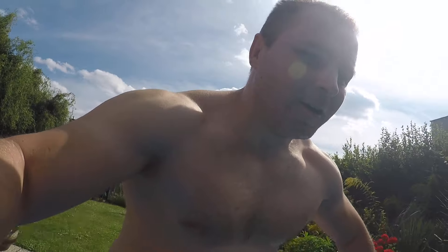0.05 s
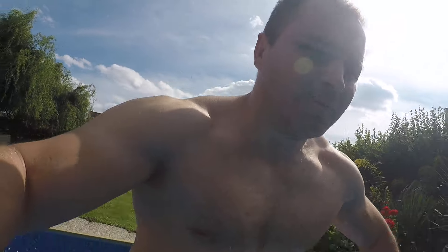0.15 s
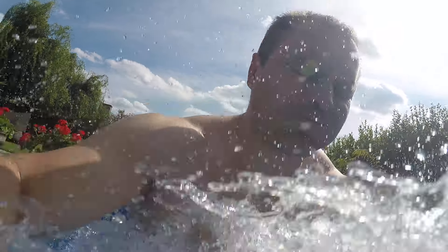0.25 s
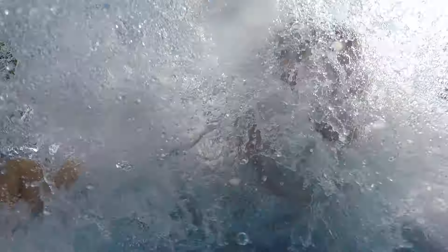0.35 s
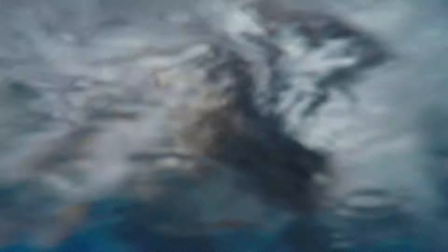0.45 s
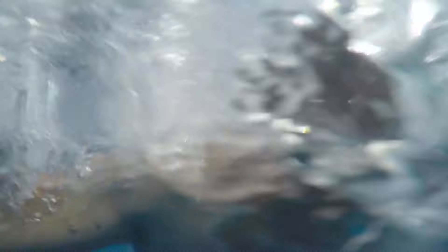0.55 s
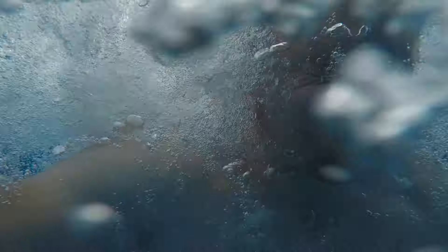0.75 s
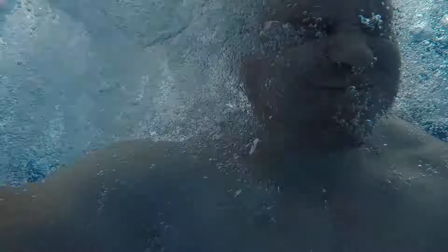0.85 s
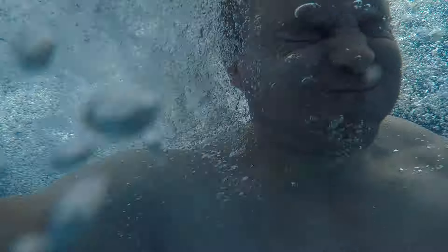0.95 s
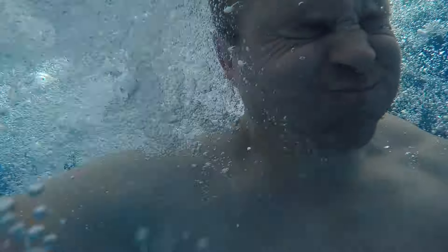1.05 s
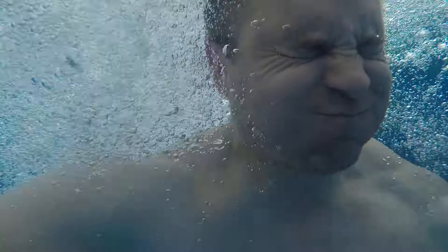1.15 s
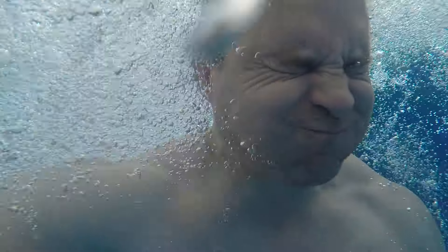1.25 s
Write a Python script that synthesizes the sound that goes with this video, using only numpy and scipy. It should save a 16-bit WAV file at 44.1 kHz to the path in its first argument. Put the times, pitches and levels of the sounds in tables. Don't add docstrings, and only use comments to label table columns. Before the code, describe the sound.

Splash into an outdoor pool, very close: low buffeting and ringing spray, sharp slaps with hollow knocks, then submerged sound, with a deep air-pocket boom, fizz turning dull and sparse soft glugs.

```python
import sys
import numpy as np
from scipy import signal
from scipy.io import wavfile
from scipy.ndimage import uniform_filter1d

SR = 44100
rng = np.random.default_rng(int(sys.argv[2]) if len(sys.argv) > 2 else 0)


def transcribe(signal):
    frames = np.atleast_2d(signal).T
    limited = np.clip(frames, -1, 1)
    pcm = np.round(limited * 32767).astype(np.int16)
    wavfile.write(sys.argv[1], SR, pcm)


def nominal_scale(level):
    x = np.asarray(level, float) / 20
    return 10 ** x


N = 57330
TIME_S = np.arange(N) / SR

# t/s, peak level/dB, t60/s, treble tilt/(dB per octave)
SLAPS = [(0.1235, -14, 0.0037, 0.5), (0.1352, -20, 0.036, 4), (0.3311, 3.5, 0.0068, -0.5),
         (0.3373, 10, 0.008, -4.5), (0.3395, -6.5, 0.032, -0.5), (0.3425, 7, 0.012, -0.5),
         (0.3478, -11.5, 0.046, -2), (0.359, -6.5, 0.017, -1), (0.3847, -3, 0.0052, -0.5),
         (0.441, -18, 0.048, 1), (0.4619, -12, 0.036, 0), (0.4656, 12, 0.014, -0.5),
         (.4677, 7.5, 0.0056, 2), (0.4729, -10.5, 0.13, -3), (0.4794, -6.5, 0.044, 0.5),
         (0.5056, -32, 0.015, 2.5), (0.524, -30, 0.062, -2.5)]


def evened(x):
    return x / np.sqrt(np.mean(x ** 2) + 1e-20)


def curve(rows, outside=-120, index=1):
    a = np.array(rows)
    return np.interp(TIME_S, a[:, 0], a[:, index], left=outside)


def read(points, hz):
    f, value = np.transpose(points)
    return np.interp(np.log(hz + 1), np.log(f + 1), value, left=-90)


def colour(x, points, tilt_db=0):
    hz = np.abs(np.fft.fftfreq(4096, 1 / SR))
    gain_db = read(points, hz) + tilt_db * np.log2((hz + 100) / 2000)
    min_phase = np.exp(np.conj(signal.hilbert(np.log(nominal_scale(gain_db)))))
    taps = np.fft.ifft(min_phase).real[:2048]
    return signal.oaconvolve(x, taps)[:len(x)]


def resonate(x, hz, width_hz):
    return signal.lfilter(*signal.iirpeak(hz, hz / width_hz, SR), x)


def drift(x, hz, width_hz):
    turn = np.exp(2j * np.pi * np.cumsum(hz) / SR)
    r = np.exp(-np.pi * width_hz / SR)
    baseband = signal.lfilter([1 - r], [1, -r], x / turn)
    return 2 * (turn * baseband).real


def add(mix, s, sound):
    part = mix[round(s * SR):][:len(sound)]
    part += sound[:len(part)]


def bubble(hz, t60, glide, rise):
    t = np.arange(0, t60, 1 / SR)
    envelope = (1 - np.exp(-t * hz / rise)) * nominal_scale(-60 * t / t60)
    return envelope * np.sin(2 * np.pi * hz * t * (1 + glide * t / t60))


def grains(lo_hz, hi_hz, per_s, cycles, spread_db, rise, count=30):
    out = np.zeros(N)
    for hz in np.geomspace(lo_hz, hi_hz, count):
        hit, size, sign = rng.random((N, 3)).T
        strength = nominal_scale(spread_db * np.minimum(-np.log(size + 1e-9), 3.2)) * np.sign(sign - .5)
        train = (hit < per_s / count / SR) * strength
        out += hz * signal.oaconvolve(train, bubble(hz, cycles / hz, 0.25, rise))[:N]
    return evened(out)


def pops(table, cycles, glide, rise, ragged, spread):
    out = np.zeros(N)
    t = np.arange(3000) / SR
    for s, db, hz in table:
        add(out, s, nominal_scale(db - 2.0) * bubble(hz, cycles / hz, glide, rise))
        burst = rng.standard_normal(3000) ** 3
        for _ in range(2):
            burst = resonate(burst, hz, spread * hz)
        envelope = nominal_scale(db - 60 * t * hz / cycles) * np.minimum(t * hz / rise, 1)
        add(out, s, ragged * envelope * evened(burst))
    return out


def slaps():
    # f/Hz, level/dB
    slap_tone = [(90, 12), (250, -13.5), (800, -12), (1840, -12), (3700, -9), (4800, -15), (10200, -25),
                 (15500, -36.5)]
    out, t = np.zeros(N), np.arange(2500) / SR
    for s, db, t60, tilt_db in SLAPS:
        x = evened(colour(rng.standard_normal(len(t)), slap_tone, tilt_db))
        add(out, s, nominal_scale(db - 1.5 - 60 * t / t60) * np.minimum(t / 0.00066, 1) * x)
    return out


def knocks():
    # t/s, peak level/dB, f/Hz
    knock_rows = [
        (.123, -30.5, 1070),
        (.3312, -0.5, 2510),
        (.3385, -7.5, 222),
        (.343, -5, 1780),
        (.343, -11, 540),
        (.349, 2.5, 3640),
        (.359, -12, 2240),
        (.4655, -10, 3630),
        (.466, 9.5, 1896),
    ]
    return pops(knock_rows, cycles=15.6, glide=0.023, rise=0.13, ragged=0.46, spread=0.65)


def shoves():
    # t/s, peak level/dB, swing f/Hz, ring/cycles, direction/(+1 or -1)
    shove_rows = [(0.291, -16, 39.8, 3, 1), (0.355, -5.5, 35, 2.6, 1), (0.38, -6.5, 21, 5.6, -1),
                  (0.403, -5.5, 46, 6.4, 1), (.428, -10, 25.7, 1.6, -1), (0.444, 5.5, 22.7, 1.7, 1),
                  (0.464, 2.5, 62, 3.94, -1), (0.481, -9, 44.9, 2.4, -1), (0.555, -20.5, 65, 5.8, 1),
                  (0.629, -20, 45.4, 2.4, 1), (0.692, -4, 66.6, 4.2, -1), (1.109, -19.5, 51.3, 3.1, -1),
                  (1.238, -34, 59.7, 12, 1)]
    out = np.zeros(N)
    for s, db, hz, cycles, way in shove_rows:
        add(out, s, nominal_scale(db + 1.0) * way * bubble(hz, cycles / hz, 0, 0.02))
    return out


def buffet():
    # t/s, level/dB
    buffet_level = [(0, -19.5), (.05, -38), (.11, -23), (.14, -24), (.234, -25), (.3, -19.5), (.34, -25.5),
                    (.44, -12.5), (.5, -25), (.58, -42), (.72, -46), (.81, -50.5), (1.07, -55.5),
                    (1.2, -45.5), (1.3, -38)]
    x = resonate(rng.standard_normal(N + SR), 28.3, width_hz=5.3)
    x = x / (uniform_filter1d(np.abs(signal.hilbert(x)), 2500) + 0.26 * x.std())
    x = signal.sosfilt(signal.butter(6, 75, fs=SR, output="sos"), x)[SR:]
    fade_in = np.minimum(.5 + np.arange(N) / 2000, 1)
    return nominal_scale(uniform_filter1d(curve(buffet_level), 400)) * evened(x) * fade_in


def spray():
    # t/s, level/dB
    spray_level = [(.121, -26), (.134, -36), (.138, -37.5), (.2, -28), (.3, -25.5), (.328, -29.5),
                   (.372, -25), (.405, -19), (.44, -24.5), (.448, -27.5), (.49, -68)]
    # f/Hz, level/dB
    spray_tone = [(150, -54), (600, -10.5), (1200, -1), (2500, -6.5), (5500, -8.5), (8000, -10.5),
                  (10300, -9), (15500, -25.5)]
    port_hz, wet_sag_hz, port_width_hz, port_db = 3835, 200, 480, 26.5
    x = grains(239, 19500, 7000, cycles=14.0, spread_db=0.86, rise=0.31)
    x = colour(x + 1.1 * rng.standard_normal(N), spray_tone)
    wet = TIME_S > SLAPS[2][0]
    port = drift(x, port_hz - wet_sag_hz * wet, port_width_hz)
    return nominal_scale(curve(spray_level) - 0.5) * evened(x + nominal_scale(port_db) * port)


def pocket():
    # t/s, f/Hz, level/dB
    pocket_rows = [
        (.698, 106.3, -45),
        (.705, 134.6, -4),
        (.713, 121, 2),
        (.722, 140, -4),
        (.74, 119, -15.5),
        (.814, 129, -30),
        (.888, 136.6, -40.5),
        (.95, 137, -69),
    ]
    turns = np.cumsum(curve(pocket_rows, 120)) / SR
    return nominal_scale(curve(pocket_rows, index=2)) * np.sqrt(2) * np.sin(2 * np.pi * (turns + 0.425))


def glugs():
    # t/s, peak level/dB, f/Hz
    glug_rows = [(.412, -14, 163.5), (.553, -8, 321), (.599, -18, 750), (.666, -11.5, 676),
                 (.685, -3.5, 321.4), (0.6995, -5, 345), (.762, -17, 432), (.772, -17.5, 340),
                 (.845, -30.5, 584), (.851, -31.5, 297), (.877, -23.5, 560), (.896, -19.5, 537),
                 (.924, -18, 553), (.965, -18.5, 517.6), (1.0, -34.5, 265), (1.02, -25.5, 496),
                 (1.043, -30, 823), (1.112, -18.5, 208.7), (1.116, -29, 456), (1.128, -18.5, 263),
                 (1.174, -30.5, 215), (1.205, -20, 418.5), (1.233, -10.5, 469), (1.247, -12, 556),
                 (1.29, -17.5, 462)]
    deep_s = .8
    early = [g for g in glug_rows if g[0] < deep_s]
    deep = [g for g in glug_rows if g[0] > deep_s]
    out = pops(early, cycles=21, glide=0.081, rise=0.61, ragged=0.43, spread=0.32)
    return out + pops(deep, cycles=33, glide=0.054, rise=1.56, ragged=0.3, spread=0.35)


def gurgle():
    # t/s, level/dB
    gurgle_level = [(.2, -47), (.3, -34.5), (.44, -29.5), (.475, -13.5), (.51, -25), (.65, -33),
                    (.68, -19.5), (.78, -23.5), (.85, -32.5), (1.07, -36.5), (1.12, -30), (1.26, -33),
                    (1.3, -28)]
    # f/Hz, level/dB
    gurgle_tone = [(60, -10.5), (150, -7.5), (400, -4), (650, -8.5), (950, -19.5), (2500, -41.5)]
    # t/s, low resonance f/Hz, high resonance f/Hz
    cavity_hz = [(.8, 294, 626), (.86, 282, 531), (.95, 247.5, 546), (1.0, 265.5, 520), (1.05, 250, 512),
                 (1.08, 239, 378), (1.12, 255, 473), (1.18, 207, 384), (1.24, 251, 512), (1.3, 224.6, 470)]
    x = grains(81.07, 2500, 700, cycles=31.7, spread_db=2.0, rise=0.747)
    x = colour(x + 0.45 * rng.standard_normal(N), gurgle_tone)
    cavity = sum(drift(x, curve(cavity_hz, 280, index=k), width_hz=30) for k in (1, 2))
    cavity_in = np.clip((TIME_S - .78) / 0.04, 0, 1)
    x = x + nominal_scale(11) * cavity * cavity_in
    return nominal_scale(curve(gurgle_level) - 3.5) * evened(x)


def ticks():
    # t/s, peak level/dB, f/Hz
    tick_rows = [(.5467, -18, 2484), (.548, -24, 1337), (.600, -30.5, 1720), (.525, -26, 1120),
                 (.578, -31, 2980), (.629, -27, 3370), (.6455, -15.5, 2644), (.6754, -38, 2490),
                 (.7063, -26, 3030), (.785, -30.5, 1476), (.786, -44, 2000), (.825, -42.5, 1770),
                 (1.0965, -48, 1940), (.9175, -43.5, 2300), (.9376, -45.5, 1684), (.970, -42.5, 1590),
                 (.971, -50, 2700), (.989, -48, 2085), (.9965, -43, 1886), (1.018, -45, 1840),
                 (1.038, -39, 1910), (1.075, -39.5, 1350), (1.076, -45, 2590), (1.0932, -42.5, 1516),
                 (1.104, -45, 2490), (1.1177, -35, 1840), (1.131, -44, 2490), (1.204, -37.5, 2190),
                 (1.207, -38.5, 1230), (1.2304, -28.5, 1820), (1.249, -40, 1740), (1.283, -47, 2350)]
    return pops(tick_rows, cycles=60, glide=0.042, rise=0.61, ragged=0.9, spread=0.17)


def snaps():
    # t/s, peak level/dB, f/Hz
    snap_rows = [(.516, -25, 5630), (.56, -27, 3900), (.604, -25.5, 4600), (.708, -37.5, 4200),
                 (.744, -31, 2960), (.766, -45.5, 4670), (.790, -28.5, 3310), (.846, -46, 3460),
                 (.871, -51.5, 5500), (.9376, -44, 4500), (.991, -52, 4950), (1.0, -45.5, 3200),
                 (1.017, -56, 3970), (.997, -39.5, 5150), (1.051, -36.5, 3670), (1.075, -35, 4220),
                 (1.094, -43.5, 4100), (1.119, -35.5, 3250), (1.133, -37, 3730), (1.189, -43.5, 3310),
                 (1.240, -49, 4440), (1.249, -22, 2934)]
    return pops(snap_rows, cycles=49.4, glide=0.05, rise=1.0, ragged=0.81, spread=0.23)


def pricks():
    # t/s, peak level/dB, f/Hz
    prick_rows = [(.527, -21, 7320), (.533, -36, 10770), (.538, -39.5, 9500), (.582, -51, 11100),
                  (.586, -49, 9700), (.678, -50, 8860), (.688, -42.5, 11190), (.712, -37.5, 6500),
                  (.767, -41.5, 9580), (.991, -49, 8620), (1.229, -54, 8200), (.547, -39, 8150),
                  (.567, -37, 11100), (.6, -32.5, 13050), (.63, -20, 9580), (.661, -25, 6500),
                  (.708, -36, 12800), (.724, -43, 9370), (.793, -49.5, 9650), (.803, -38.5, 7700),
                  (1.19, -42.5, 6160), (1.22, -41.5, 7550), (1.257, -44.5, 9860), (1.26, -44, 6000),
                  (1.292, -71, 13100)]
    return pops(prick_rows, cycles=40, glide=0.025, rise=1.3, ragged=0.34, spread=0.35)


def fizz():
    # t/s, level/dB
    fizz_level = [(.478, -48), (.5, -25.5), (.57, -31.5), (.7, -30.5), (.8, -45.5), (.86, -52),
                  (1.17, -72.5), (1.22, -42.5), (1.3, -58)]
    # f/Hz, level/dB
    fizz_tone = [(300, -10), (600, 1.5), (1300, -6), (2500, -1), (4500, -8), (15500, -36)]
    dull_db_per_oct_s = -47.5
    x = grains(500, 15000, 3000, cycles=24, spread_db=4.8, rise=1.5)
    x = evened(colour(x + .3 * rng.standard_normal(N), fizz_tone))
    hz, t, z = signal.stft(x, SR, nperseg=256)
    octaves = np.log2((hz[:, None] + 300) / 2500)
    z = z * nominal_scale(dull_db_per_oct_s * octaves * np.clip(t - .64, 0, .3))
    return nominal_scale(curve(fizz_level) - 2.5) * signal.istft(z, SR, nperseg=256)[1][:N]


def air():
    # f/Hz, level/dB
    air_tone = [(100, 9), (160, -50), (2900, -40.5), (3900, -31.5), (5400, -42.5), (15500, -53)]
    air_db, sunk_db, sunk_s = -51.5, -27.5, .47
    level = nominal_scale(air_db + sunk_db * (TIME_S > sunk_s))
    return level * evened(colour(rng.standard_normal(N), air_tone))


def scene():
    impact = slaps() + knocks() + shoves() + buffet() + spray()
    bubbles = pocket() + glugs() + gurgle() + ticks() + snaps() + pricks() + fizz()
    return (impact + bubbles + air())[None]


def low_pass(x):
    return signal.sosfilt(signal.butter(12, 15630, fs=SR, output="sos"), x)


def record(dry):
    clip_level, edge_hz = .97, 15620
    x = dry / (1 + np.abs(dry / clip_level) ** 8) ** (1 / 8)
    band = signal.firwin(255, edge_hz, window=("kaiser", 8), fs=SR)
    x = signal.oaconvolve(x, band[None], "same")
    return low_pass(x)


dry = scene()
out = record(dry)
transcribe(out)
```